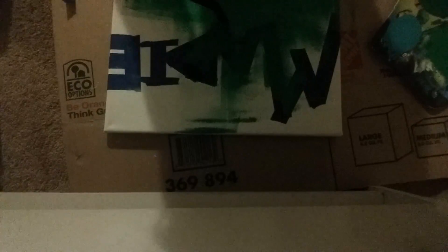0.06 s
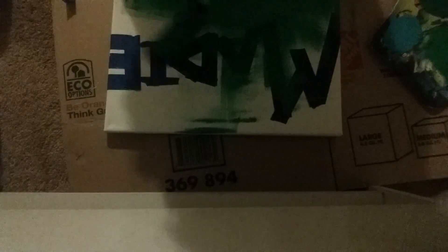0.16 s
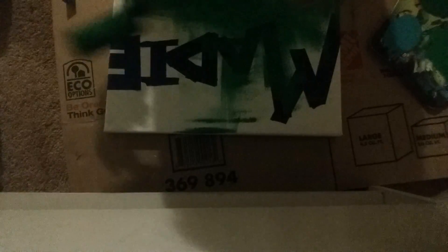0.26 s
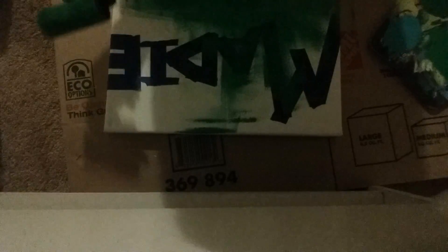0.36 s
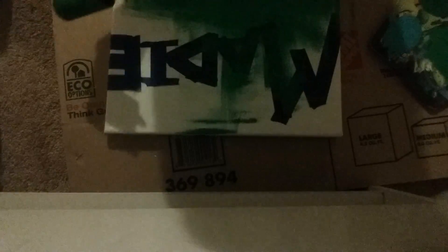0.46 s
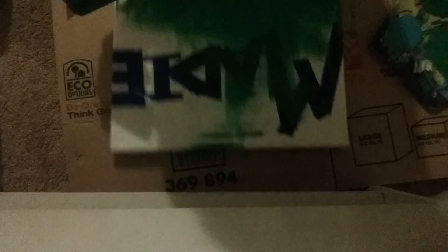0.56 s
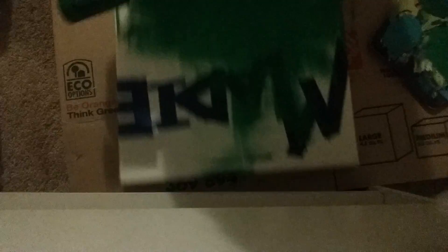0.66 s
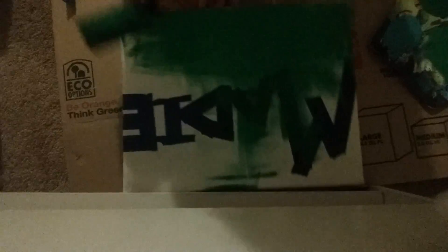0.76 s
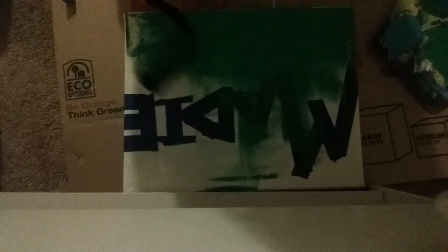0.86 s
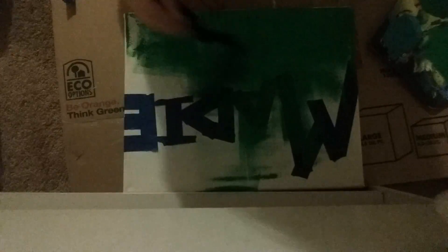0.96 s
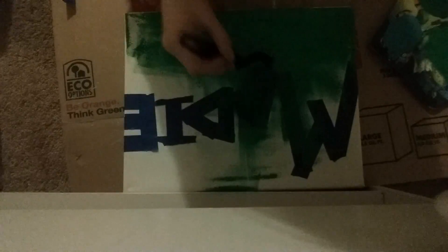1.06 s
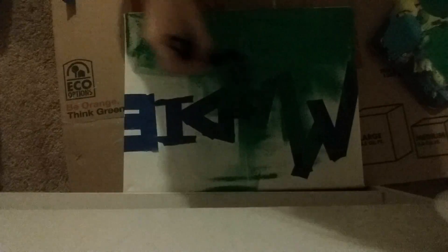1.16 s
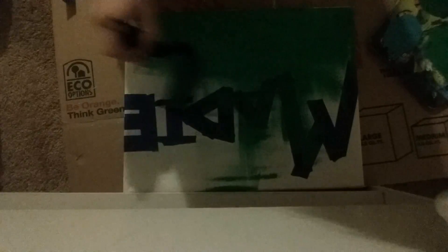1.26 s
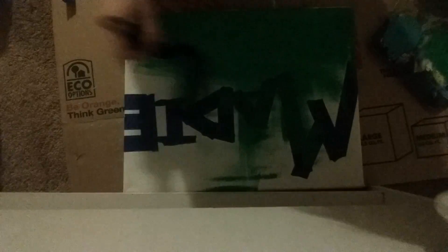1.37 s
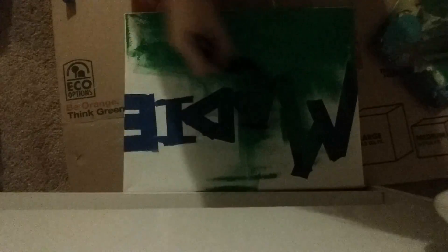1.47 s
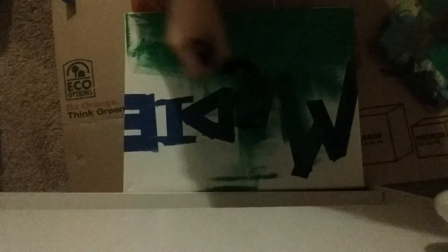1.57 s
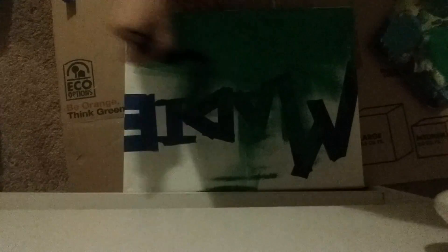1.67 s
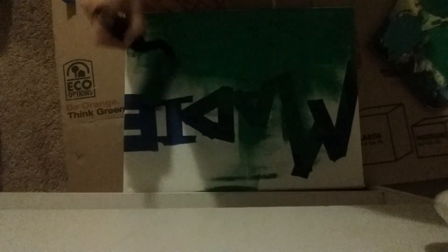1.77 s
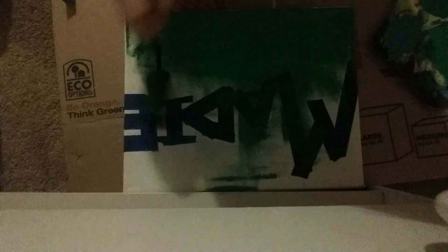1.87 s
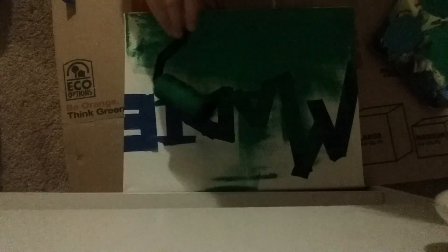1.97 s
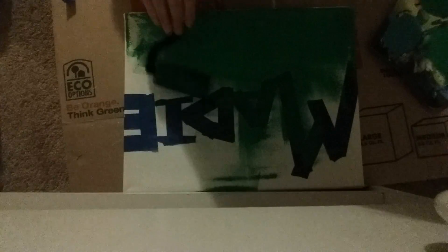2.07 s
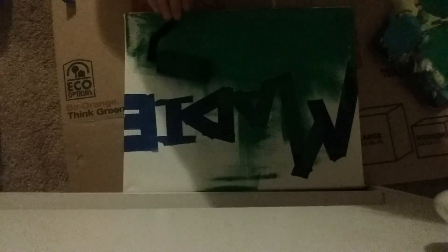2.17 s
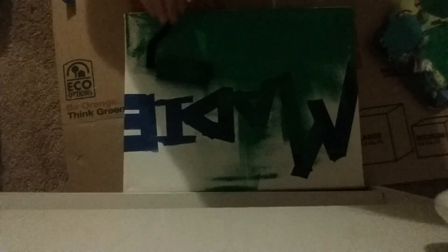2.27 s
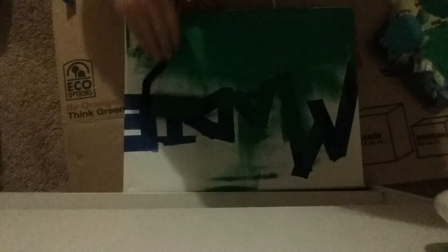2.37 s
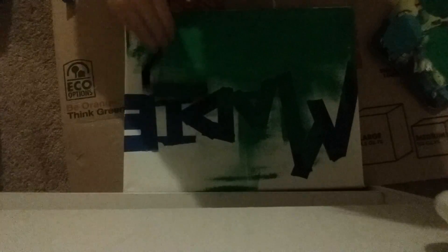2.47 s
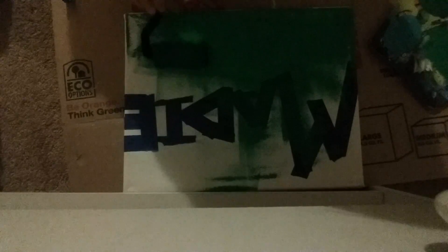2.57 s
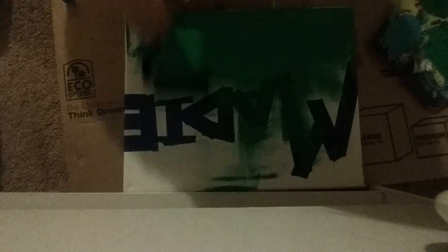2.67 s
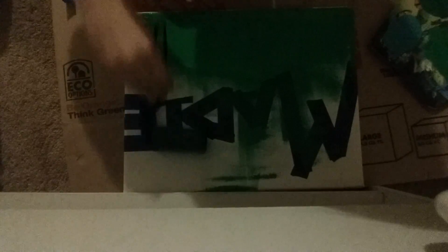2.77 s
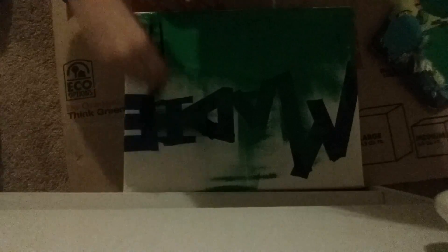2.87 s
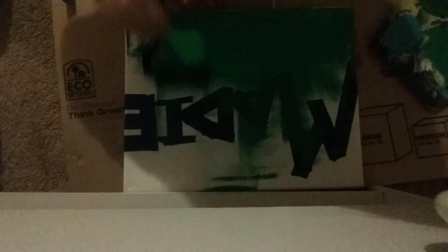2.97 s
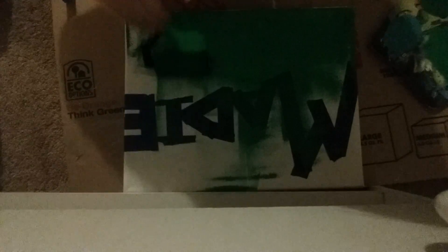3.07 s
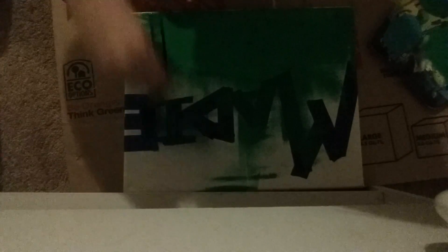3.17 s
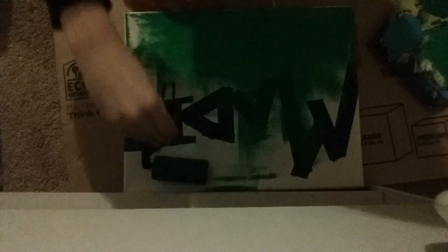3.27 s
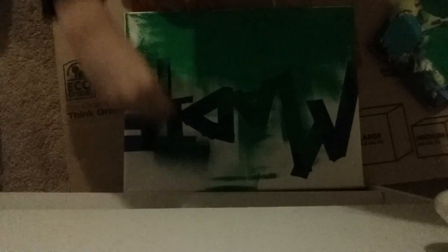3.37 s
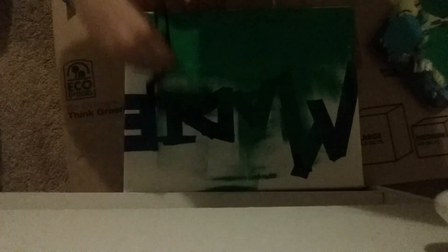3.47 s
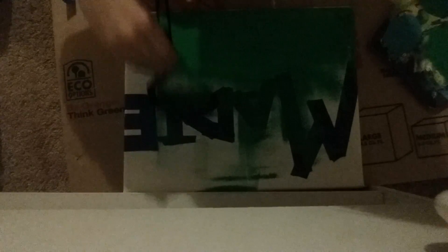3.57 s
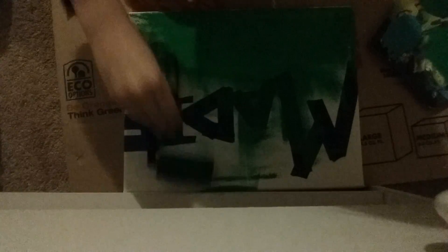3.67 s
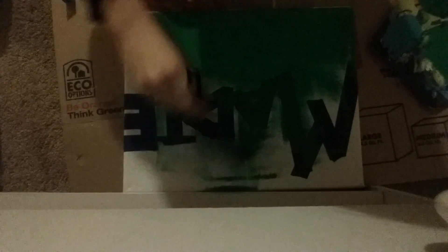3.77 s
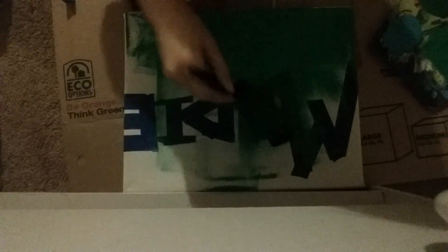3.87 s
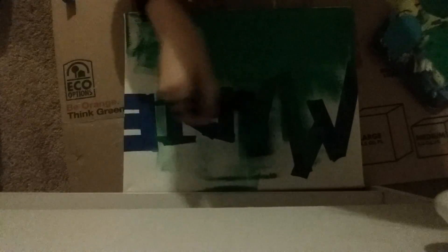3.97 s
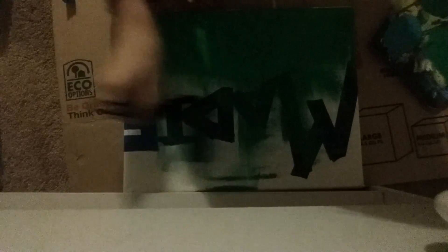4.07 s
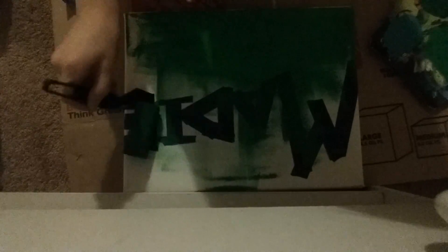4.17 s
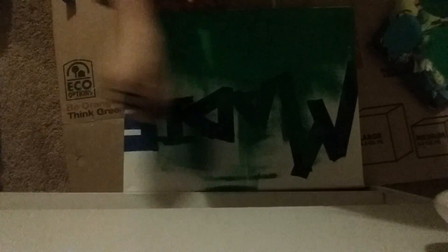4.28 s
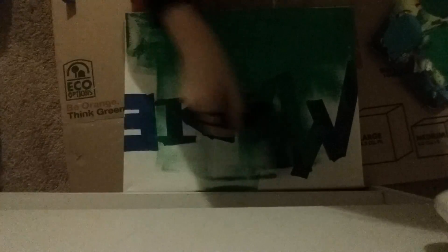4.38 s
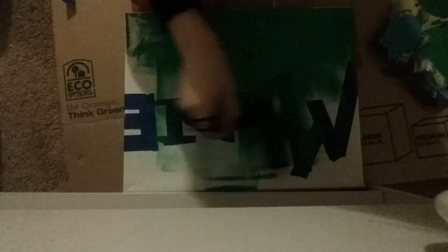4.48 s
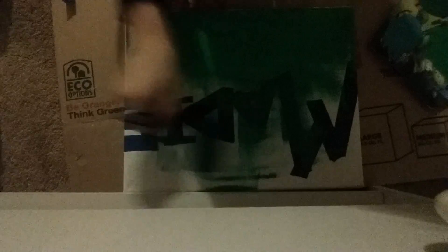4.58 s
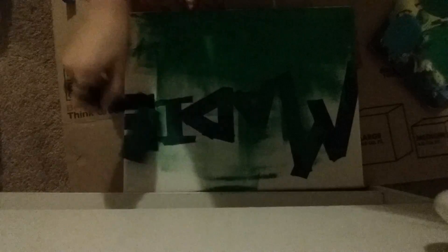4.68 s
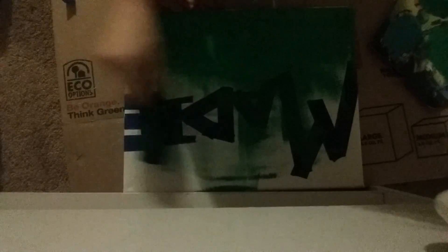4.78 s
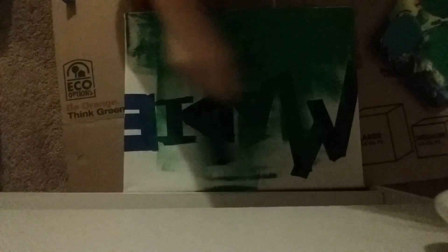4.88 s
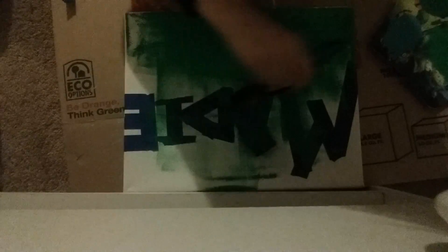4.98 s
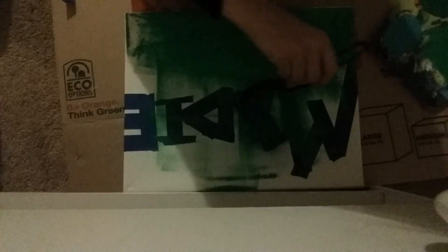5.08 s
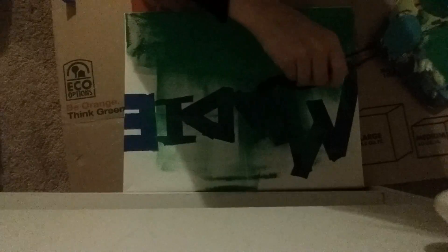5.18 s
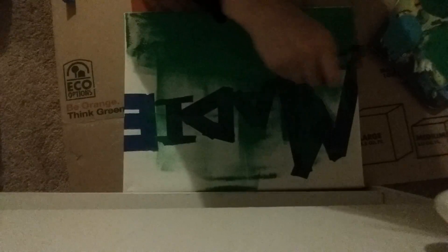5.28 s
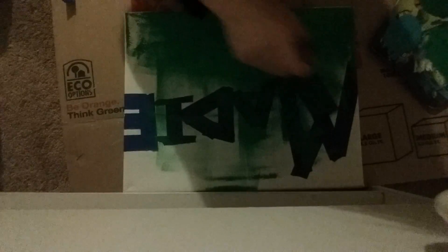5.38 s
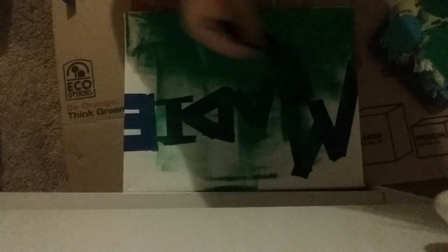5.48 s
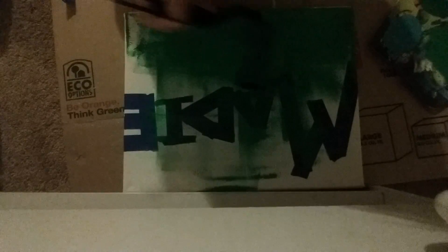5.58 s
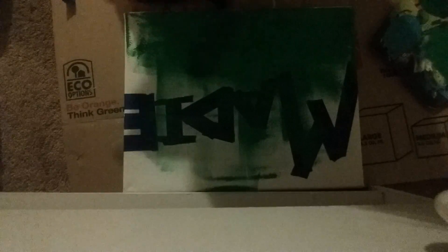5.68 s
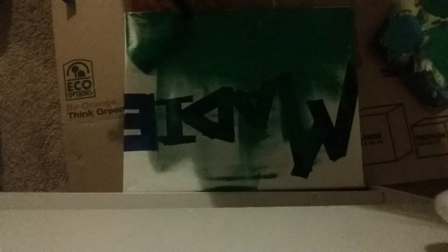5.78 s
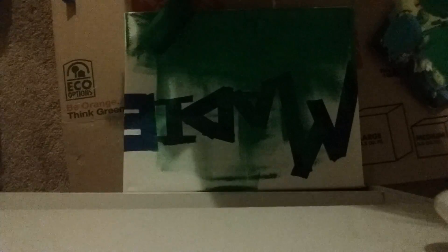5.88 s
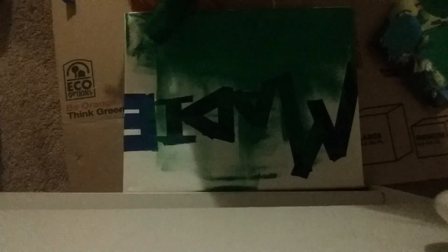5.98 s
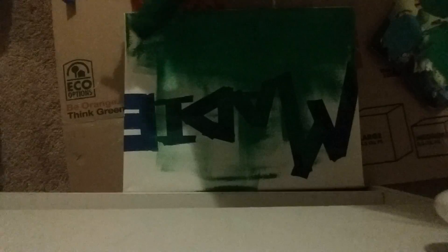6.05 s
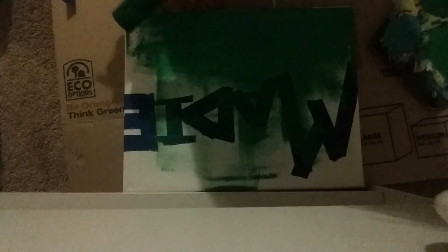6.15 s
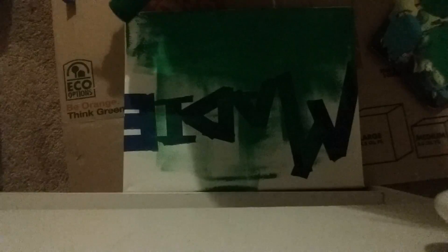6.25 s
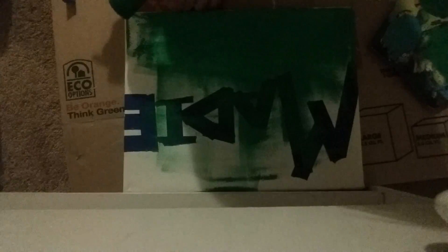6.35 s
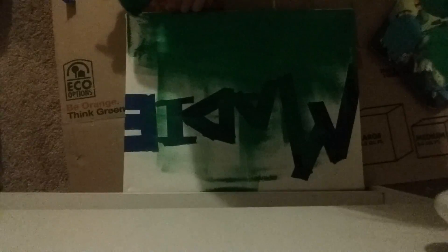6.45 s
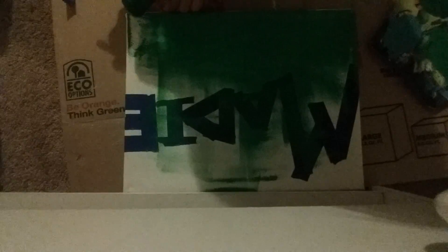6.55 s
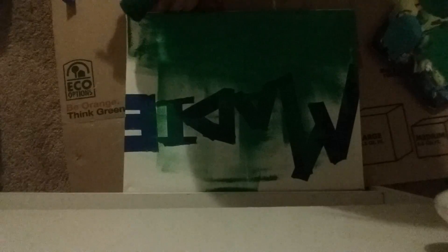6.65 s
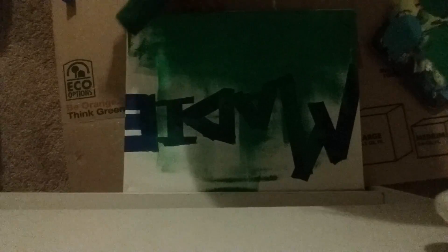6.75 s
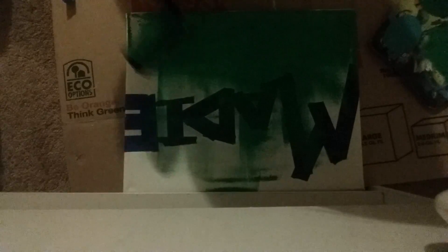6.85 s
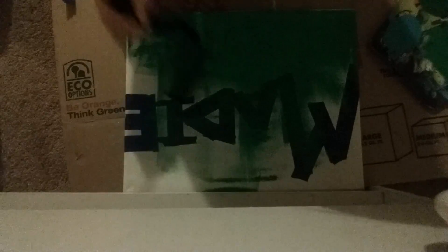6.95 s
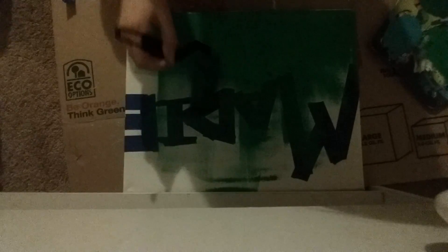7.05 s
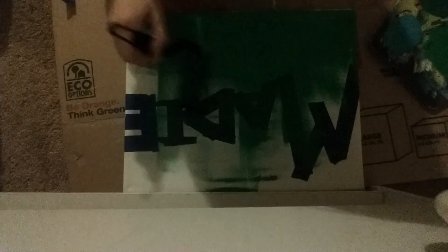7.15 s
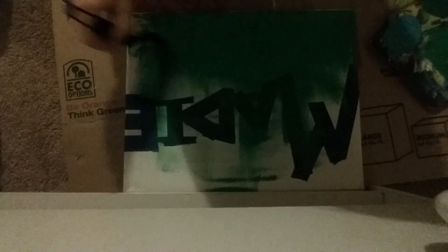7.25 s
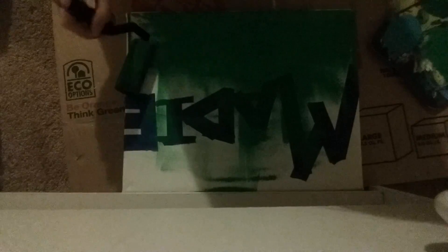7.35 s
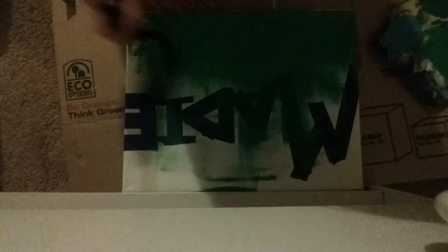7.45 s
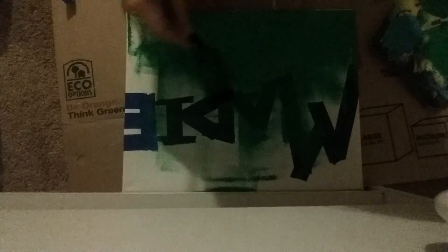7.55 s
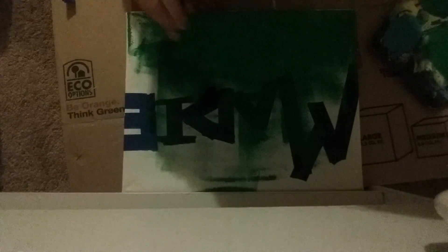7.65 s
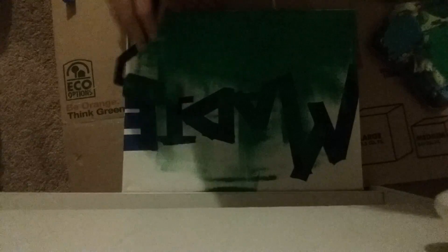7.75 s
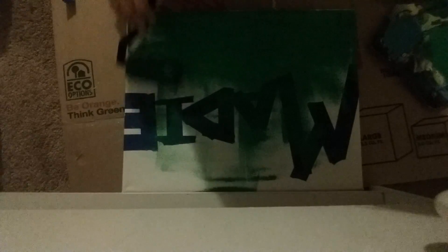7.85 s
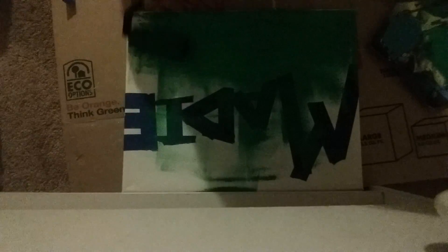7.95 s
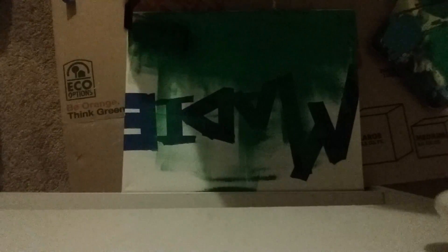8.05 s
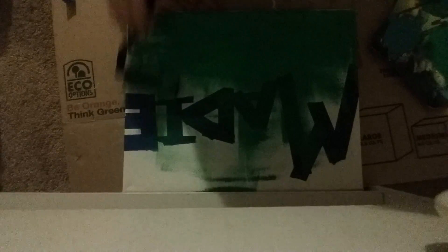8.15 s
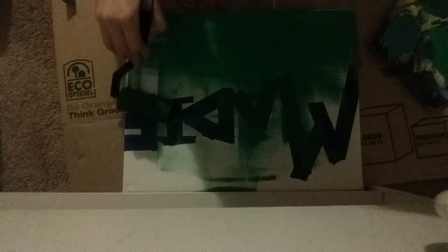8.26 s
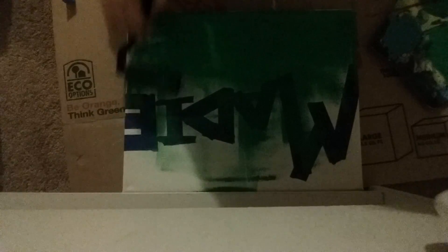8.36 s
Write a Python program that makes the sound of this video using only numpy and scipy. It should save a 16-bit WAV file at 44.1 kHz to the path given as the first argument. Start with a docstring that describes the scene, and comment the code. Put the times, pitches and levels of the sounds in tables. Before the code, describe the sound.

A foam paint roller rubs over a stretched canvas in soft quick strokes, after a loud slide and thump, with scattered knocks in a quiet room.

```python
"""Foam roller on a stretched canvas

Place: a quiet room, a canvas lying on cardboard, a foam paint roller worked to and fro over it.
The canvas is first slid into place: tiny fibre catches make nap hiss, weave scratch and drumming cloth.
Knocks of roller and frame are noise bursts and ringing modes with a room echo; one hard edge drags briefly.
Shaped noise gives the room air and a low rumble that swells around heavy thumps and slides; a sine whines thinly.
The microphone pair faces sideways: the left port is bright, the right one is shaded.
"""
import sys
import numpy as np
from scipy import signal
from scipy.fft import rfft, irfft, next_fast_len
from scipy.io import wavfile

SR = 44100
rng = np.random.default_rng(int(sys.argv[2]) if len(sys.argv) > 2 else 0)


def inscribe(sig):
    """Save sig as 16-bit PCM at rate SR to the path in sys.argv[1].

    A 1-D sig is mono; a 2-D sig holds one channel per row.
    Samples are clipped to [-1, 1] before scaling.
    """
    pcm = np.round(np.clip(np.atleast_2d(sig).T, -1, 1) * 32767)
    wavfile.write(sys.argv[1], SR, pcm.astype(np.int16))


N = 371322   # samples


def amp(db):
    """Turn dB into gain."""
    return 10 ** (np.asarray(db) / 20)


def unit_rms(x):
    """Scale to rms 1."""
    return x / np.sqrt(np.mean(x ** 2) + 1e-20)


def unit_peak(x):
    """Scale to peak 1."""
    return x / np.abs(x).max()


def unit_centre(pair):
    """Scale a pair so that the mean of its channels has rms 1."""
    return pair / np.sqrt(np.mean(pair.mean(axis=0) ** 2))


def level_curve(rows):
    """Join the (time_s, level_db) points of a table by straight lines, one value per sample."""
    time_s, level_db = np.transpose(rows)
    return np.interp(np.arange(N) / SR, time_s, level_db)


def at_hz(points, hz):
    """Read a spectrum table on a log-frequency axis."""
    point_hz, value = np.transpose(points)
    return np.interp(np.log(np.maximum(hz, 1)), np.log(point_hz), value)


def drift(rate_hz):
    """Slow random wander of rms 1: noise through two equal low-pass poles, at one point per 40 samples."""
    pole = np.exp(-2 * np.pi * rate_hz * 40 / SR)
    noise = rng.standard_normal(N // 40 + 2002)
    slow = signal.lfilter([1], [1, -2 * pole, pole * pole], noise)[2000:]   # the filter has settled
    return np.interp(np.arange(N) / 40, np.arange(len(slow)), unit_rms(slow))


def ring(drive, hz, t60_s):
    """Two-pole resonator: a unit click sets a decaying sine of starting height 1 ringing."""
    radius, angle = amp(-60 / (t60_s * SR)), 2 * np.pi * hz / SR
    return signal.lfilter([0, np.sin(angle)], [1, -2 * radius * np.cos(angle), radius * radius],
                          drive + 1e-18)


# How the near sounds differ between the ports: pitch_hz, left_minus_right_db
NEAR_SHADE = [(60, -5), (110, -6), (200, -0.5), (380, -1), (700, -0.5), (1290, 2.5), (2380, 5), (4400, 13),
              (8120, 24), (15000, 4.5)]
# How alike the two ports hear a sound: pitch_hz, likeness (values below 0 count as 0)
PORT_LIKENESS = [(60, 1), (180, 0.91), (550, 0.71), (1650, -0.26), (4970, 0.59), (15000, -0.54)]
# Spectrum without colour: pitch_hz, level_db
NO_COLOUR = [(20, 0), (20000, 0)]
LEFT_LAG_S = -0.000061   # negative: sound reaches the left port first


def ports(near, apart, spectrum, shade):
    """Colour a sound and share it between the ports: likeness, shading and delay act per frequency."""
    size = next_fast_len(N)
    hz = np.arange(size // 2 + 1) * SR / size
    alike = np.clip(at_hz(PORT_LIKENESS, hz), 0, 1)
    common = np.sqrt(1 + alike) * rfft(near, size)
    opposed = np.sqrt(1 - alike) * rfft(apart, size)
    tilt = amp(at_hz(shade, hz) / 2)   # half the difference goes to each port
    lag = np.exp(-2j * np.pi * hz * LEFT_LAG_S)
    left, right = (common + opposed) * tilt * lag, (common - opposed) / tilt
    pair = np.array([left, right]) / np.hypot(tilt, 1 / tilt)
    return irfft(pair * amp(at_hz(spectrum, hz)), size)[:, :N]


def grit(per_s, spread_db, clump_db):
    """Two draws of tiny catches: random clicks of uneven size and either sign, swelling in clumps."""
    sizes = amp(spread_db * np.minimum(rng.exponential(1, (2, N)), 4))
    signs = rng.choice([-1, 1], (2, N))
    caught = rng.random((2, N)) < per_s / SR
    return sizes * signs * caught * amp(clump_db * drift(28.6))


def with_notes(pair, notes, flicker_db, rate_hz):
    """Add narrow resonances that flare up and fade, each in its own time."""
    flares = 0
    for pitch_hz, level_db, t60_s in notes:
        note = unit_centre(ring(pair, pitch_hz, t60_s))
        flares = flares + amp(level_db + flicker_db * np.tanh(drift(rate_hz))) * note
    return unit_centre(unit_centre(pair) + flares)


# How the diffuse sound differs between the ports: pitch_hz, left_minus_right_db
DIFFUSE_SHADE = [(60, -1), (150, -3.5), (380, -3), (950, -22), (2380, -62), (5980, 9), (15000, -6.5)]
# Middle level of the low rumble, swelling around the heavy thumps and slides: time_s, level_db
RUMBLE_LEVEL = [(0.0, -60), (0.82, -50), (2.16, -58.5), (4.92, -54.5), (5.27, -60.5), (5.93, -58.5),
                (6.56, -50), (7.48, -57.5), (7.95, -50.5), (8.42, -54.5)]
# Colour of the low rumble: pitch_hz, level_db (relative, per Hz)
RUMBLE_COLOUR = [(15, -71), (25, -60), (43, -18), (51, -8), (62, -6), (80, 6.5), (103, -4.5), (135, -2),
                 (151, -25), (180, -70), (230, -58), (400, -120)]


def low_rumble():
    """Shaped noise rumbles lumpily: a random drift rides on its level curve."""
    rumble = unit_centre(ports(*rng.standard_normal((2, N)), RUMBLE_COLOUR, DIFFUSE_SHADE))
    return amp(level_curve(RUMBLE_LEVEL) + 1.75 * drift(7.5)) * rumble


# Colour of the room air: pitch_hz, level_db (relative, per Hz)
AIR_COLOUR = [(88, -39), (150, -13), (182, -20), (213, 0), (296, -10.5), (373, 0), (500, -64), (844, -22),
              (1480, -25), (1940, -47), (2500, -24), (2920, -27), (15500, -26)]
AIR_DB = -70.5   # middle level


def room_air():
    """Shaped noise, gently wavering in level."""
    air = unit_centre(ports(*rng.standard_normal((2, N)), AIR_COLOUR, DIFFUSE_SHADE))
    return amp(AIR_DB + 1.9 * drift(4)) * air


WHINE_HZ, WHINE_DB = 1558, -88


def thin_tone():
    """A steady sine, opposite in the two channels."""
    return amp(WHINE_DB) * np.sin(2 * np.pi * WHINE_HZ * np.arange(N) / SR) * [[1], [-1]]


# Strokes of roller or sliding canvas: fastest_s (moment of top speed), speed_up_s, slow_down_s,
# squeak_db (squeaky hiss of the nap), wide_db (hiss above and below the squeak, against its usual share),
# weave_db (scratch on the weave), cloth_db (drumming of the cloth)
STROKES = [(0.2, .4, 0.98, -69, -3, -66.5, -65), (0.52, 0.085, 0.043, -69, 5, -63, -53.5),
           (0.746, .21, 0.16, -49.5, 0, -48, -44), (0.87, 0.066, 0.13, -56.5, -1, -53, -52.5),
           (1.292, 0.33, 0.15, -54.5, -4.5, -58, -55), (1.52, .13, 0.12, -64, -1.5, -61.5, -60.5),
           (1.77, 0.16, .13, -64, -2.5, -62, -60), (1.91, 0.07, 0.027, -63.5, 0, -62.5, -65.5),
           (2.04, 0.3, 0.41, -79.5, -1.5, -79, -69.5), (2.2, 0.074, 0.12, -75, 1, -67.5, -66),
           (2.43, 0.099, 0.08, -70.5, -3.5, -68.5, -65), (2.6, 0.086, .11, -70.5, -2, -65.5, -62.5),
           (2.8, 0.078, .13, -68, -2.5, -62, -58.5), (3.071, 0.14, 0.065, -68, -1, -63.5, -63),
           (3.29, 0.13, 0.13, -67.5, 0.5, -61, -61.5), (3.52, 0.099, 0.11, -70, 1.5, -64, -60),
           (3.81, 0.21, 0.13, -67.5, -0.2, -64, -63), (4.222, 0.18, .09, -68, 2, -61, -59.5),
           (4.41, 0.1, 0.15, -63.5, .4, -59.5, -61.5), (4.712, 0.17, 0.15, -65.5, 0, -61.5, -56),
           (4.98, 0.17, .24, -73.5, 1.2, -69.5, -64.5), (5.341, 0.14, 0.023, -71, -1.5, -75, -86),
           (5.7, 0.38, 0.31, -73.5, -3, -73.5, -73), (6.211, 0.036, .06, -67, -12, -57.5, -59),
           (6.29, 0.12, 0.18, -55, -0.5, -66.5, -60), (6.44, 0.069, 0.051, -58.5, 6.5, -53.5, -47.5),
           (6.53, 0.15, 0.078, -70, 4.5, -61, -52.5), (6.72, 0.15, 0.17, -75, 6, -62, -52.5),
           (6.819, 0.056, 0.086, -52.5, 1, -48, -44.5), (7.0, 0.42, .2, -61.5, -0.5, -65, -62.5),
           (7.35, 0.19, 0.11, -69.5, -2.5, -66, -61.5), (7.55, 0.1, 0.17, -72.5, -1, -65.5, -69),
           (7.86, .11, 0.18, -71, -3, -81, -79), (8.04, 0.17, 0.11, -72, -1, -66.5, -63.5),
           (8.269, 0.14, 0.08, -65.5, -1, -60.5, -60.5), (8.43, 0.069, .1, -73, 2, -73, -74)]
NAP_POWER, WEAVE_POWER, CLOTH_POWER = 1.68, 1.6, 1   # gain grows as speed to this power
NAP_REST_DB, WEAVE_REST_DB, CLOTH_REST_DB = -86, -78, -72.5   # faint contact between strokes


def strokes():
    """Speed swells and sinks as a quarter sine each way; gains of squeak, wide hiss, weave and cloth follow."""
    t = np.arange(N) / SR
    rest_db = [NAP_REST_DB, NAP_REST_DB, WEAVE_REST_DB, CLOTH_REST_DB]
    speed_law = np.array([NAP_POWER, NAP_POWER, WEAVE_POWER, CLOTH_POWER])[:, None]
    power = amp(rest_db)[:, None] ** 2 * np.ones(N)
    for fastest_s, up_s, down_s, squeak_db, wide_db, weave_db, cloth_db in STROKES:
        start_s, end_s = fastest_s - up_s, fastest_s + down_s
        part = slice(max(round(start_s * SR), 0), round(end_s * SR))
        phase = np.interp(t[part], [start_s, fastest_s, end_s], [-1, 0, 1])
        speed = np.cos(np.pi / 2 * phase).clip(0)
        top_gain = amp([squeak_db, squeak_db + wide_db, weave_db, cloth_db])[:, None]
        power[:, part] += (top_gain * speed ** speed_law) ** 2
    return np.sqrt(power)


# Colour of the foam nap's hiss: pitch_hz, level_db (relative, per Hz)
NAP_COLOUR = [(2060, -11.5), (3500, -8.5), (4220, -7.5), (5310, -8), (6690, 1), (9070, -12), (14600, -8.5),
              (15500, 17)]
# Narrow notes inside the squeak: pitch_hz, level_db (before flicker), t60_s
WHISTLES = [(6300, -15, 0.0051), (7020, -19, 0.0078)]
SQUEAK_HZ = [4830, 7270]   # band edges


def nap_hiss(squeak_gain, wide_gain):
    """Dense fibre catches hiss; the squeaky band whistles and has its own gain beside the rest."""
    hiss = ports(*grit(per_s=14000, spread_db=2.0, clump_db=1.5), NAP_COLOUR, NEAR_SHADE)
    squeak, rest = (signal.sosfilt(signal.butter(3, SQUEAK_HZ, kind, fs=SR, output="sos"), hiss)
                    for kind in ("bandpass", "bandstop"))
    whistling = with_notes(squeak, WHISTLES, flicker_db=10.0, rate_hz=3.7)
    return squeak_gain * whistling + wide_gain * rest / np.std(squeak.mean(axis=0))


# Colour of scratch and crackle on the weave: pitch_hz, level_db (relative, per Hz)
WEAVE_COLOUR = [(350, -40), (600, -8), (664, -13.5), (902, -12.5), (1240, -10), (1370, -6.5), (1980, -9.5),
                (2620, -11), (5500, -15), (7150, -32), (12100, -120)]
# Narrow notes inside the scratch: pitch_hz, level_db (before flicker), t60_s
GRAIN_NOTES = [(1200, -12, 0.011), (2104, -20, 0.017)]


def weave_scratch(weave_gain):
    """Sparser catches on the weave scratch and excite flaring notes."""
    weave = ports(*grit(per_s=4000, spread_db=-1.0, clump_db=2.0), WEAVE_COLOUR, NEAR_SHADE)
    return weave_gain * with_notes(weave, GRAIN_NOTES, flicker_db=9.5, rate_hz=4.45)


CRACKLE_PER_S, CRACKLE_DB = 250, -7.5   # level against the scratch


def paint_crackle(weave_gain):
    """Wet paint snaps in sparse clicks that rise and fall with the scratch."""
    crackle = ports(*grit(CRACKLE_PER_S, spread_db=2.5, clump_db=4.0), WEAVE_COLOUR, NEAR_SHADE)
    return weave_gain * amp(CRACKLE_DB) * unit_centre(crackle)


# Modes of stretched cloth and frame: pitch_hz, level_db (relative), t60_s (each player shortens it)
CANVAS_MODES = [(148, -68, 0.12), (171.4, -0.5, 0.35), (209.3, 1.5, 0.13), (260.5, -2.5, 0.18),
                (345.5, 8, 0.046), (420.6, 5, 0.063), (504, -6, 0.11), (649, -12, 0.61), (790, -28, 0.037),
                (1050, -5, 0.25), (1230, -32, 0.046)]


def cloth_drumming(cloth_gain):
    """Catches shake the stretched cloth and set seven of its modes ringing."""
    shakes = grit(per_s=900, spread_db=3.5, clump_db=-0.44)
    rings = 0
    for pitch_hz, level_db, t60_s in CANVAS_MODES[1:8]:
        mode = np.array([ring(shake, pitch_hz, 0.76 * t60_s) for shake in shakes])
        rings = rings + amp(level_db) * mode / np.sqrt(pitch_hz * t60_s)
    return cloth_gain * unit_centre(ports(*rings, NO_COLOUR, NEAR_SHADE))


def rubbing():
    """The nap hisses, the weave scratches, paint crackles and the cloth drums, all led by the strokes."""
    squeak_gain, wide_gain, weave_gain, cloth_gain = strokes()
    nap = nap_hiss(squeak_gain, wide_gain)
    scratch = weave_scratch(weave_gain)
    return nap + scratch + paint_crackle(weave_gain) + cloth_drumming(cloth_gain)


# Knocks of roller and frame: start_s, tick_db (bright tick), crack_db, crack_hz (crack pitch),
# thud_db, thud_hz (pitch the thud favours), boom_db (boom of the board); levels before the low cut
KNOCKS = [(0.105, -54, -33, 5000, -49, 433, -39), (0.478, -36, -29, 1160, -31.5, 330, -37.5),
          (0.511, -36, -22.5, 627, -28, 403, -54), (0.549, -59, -38, 1030, -42, 294, -60),
          (0.835, -59, -38, 800, -17, 326, -13.5), (0.849, -60, -45, 700, -15.5, 184, -15.5),
          (2.175, -48, -36.5, 1830, -54, 153, -40), (2.845, -64, -60, 900, -37, 193, -65),
          (3.316, -63, -48, 880, -39, 156, -37), (3.848, -44.5, -48, 700, -33.5, 258, -39),
          (4.073, -52, -38, 1340, -40.5, 205, -74), (5.151, -58, -47, 1060, -53, 132, -64),
          (6.195, -66, -45, 1020, -46, 374, -61), (6.303, -48, -35, 1050, -31.5, 427, -66),
          (6.435, -48, -31.5, 940, -25.5, 268, -28), (6.465, -57, -38, 800, -48, 180, -44),
          (6.717, -62, -50, 670, -40, 303, -41), (6.807, -35, -31, 3050, -40, 370, -62),
          (6.855, -38, -51, 2600, -39.5, 427, -69), (7.122, -52, -37, 1050, -39, 158, -44),
          (7.498, -41.5, -39, 1660, -64, 300, -51), (7.592, -52, -36, 2980, -60, 175, -64),
          (7.882, -43, -36, 1260, -29.5, 163, -47), (7.892, -47, -31, 1200, -51, 168, -51),
          (8.213, -56, -41, 554, -43.5, 136, -36.5)]
BOOM_HZ, BOOM_T60_S = 98.8, 0.39   # the cardboard under the canvas
THUD_LENGTH = 0.38   # share of the modes' ring time
CRUMBLE_CYCLES, CONTACT_CYCLES = 1.49, 0.055   # trailing pushes; softness, so low blows are softer
TICK_HZ, TICK_T60_S, CRACK_T60_S = [2000, 7900], 0.035, 0.029


def knocks():
    """Each blow ticks and cracks, then crumbles into the modes near its pitch and shakes the cardboard."""
    out, t = np.zeros(N + SR), np.arange(SR // 2) / SR
    click = t == 0
    mode_hz, mode_db, mode_t60 = np.transpose(CANVAS_MODES)[:, :, None]
    luck_db = rng.normal(0, 0.4, (len(KNOCKS), len(CANVAS_MODES), 1))
    noise = rng.standard_normal((len(KNOCKS), 3, len(t)))
    boom = amp(-60 * t / BOOM_T60_S) * np.sin(2 * np.pi * BOOM_HZ * t) * (1 - np.exp(-t / 0.033))
    tick_band = signal.butter(2, TICK_HZ, "band", fs=SR, output="sos")
    for k, (start_s, tick_db, crack_db, crack_hz, thud_db, thud_hz, boom_db) in enumerate(KNOCKS):
        away_db = -13.0 * np.abs(np.log2(mode_hz / thud_hz))   # modes far from the thud's pitch stay weak
        decay_db = -60 * t / (mode_t60 * THUD_LENGTH)
        modes = amp(mode_db + away_db + luck_db[k] + decay_db) * np.sin(2 * np.pi * mode_hz * t)
        pushes = noise[k, 0] * t * np.exp(-t * thud_hz / CRUMBLE_CYCLES)   # small pushes trail the blow
        blow = 2.17 * pushes / np.linalg.norm(pushes) + click
        softness = np.exp(-thud_hz / (CONTACT_CYCLES * SR))
        soft_blow = signal.lfilter([1], [1, -softness], blow)
        thud = signal.fftconvolve(modes.sum(axis=0), soft_blow)[:len(t)]
        crack_drive = noise[k, 1] * amp(-60 * t / CRACK_T60_S) + 16.0 * click
        crack = ring(crack_drive, crack_hz, 4.8 / crack_hz)
        tick = signal.sosfilt(tick_band, noise[k, 2] * amp(-60 * t / TICK_T60_S))
        i = round(start_s * SR)
        out[i:i + len(t)] += (amp(tick_db) * unit_peak(tick) + amp(crack_db) * unit_peak(crack)
                              + amp(thud_db) * unit_peak(thud) + amp(boom_db) * boom)
    low_cut = signal.butter(2, 70, "high", fs=SR, output="sos")   # keeps the knocks free of deep bass
    return signal.sosfilt(low_cut, out[:N])


ROOM_T60_S, ROOM_DB = 0.39, -11.5   # level is applied in scene(), against the direct knocks


def room(x):
    """Walls answer after 4 ms with decaying noise, in two independent echoes."""
    t = np.arange(round(.4 * SR)) / SR
    tail = rng.standard_normal((2, len(t))) * amp(-60 * t / ROOM_T60_S) * (t > .004)
    unit_tail = tail / np.sqrt((tail ** 2).sum(axis=1, keepdims=True))
    return signal.fftconvolve(x[None], unit_tail, axes=1)[:, :N]


# A hard edge drags briefly: time_s, level_db
SCRAPE_LEVEL = [(6.77, -83), (6.8, -44), (6.812, -40.5), (6.858, -52), (6.88, -72), (6.92, -75)]
# Colour of the scrape: pitch_hz, level_db (relative, per Hz)
SCRAPE_COLOUR = [(1200, -34), (2000, -2), (2550, 6), (3200, 5), (4400, -3), (5400, -26)]


def scrape():
    """Coarse slips of an edge, heard only while it drags."""
    t = np.arange(N) / SR
    slips = ports(*grit(per_s=1400, spread_db=-3.5, clump_db=-4.0), SCRAPE_COLOUR, NEAR_SHADE)
    dragging = (t > SCRAPE_LEVEL[0][0]) * (t < SCRAPE_LEVEL[-1][0])
    return amp(level_curve(SCRAPE_LEVEL)) * dragging * unit_centre(slips)


def scene():
    """Sum rumble, air and tone, the rubbing, the knocks with their echo, and the scrape."""
    blows = knocks()
    echo = amp(ROOM_DB) * room(blows)
    # the echo differs most between the ports
    heard = ports(blows + echo[0], 1.8 * echo[1] + 0.24 * blows, NO_COLOUR, NEAR_SHADE)
    return rubbing() + scrape() + heard + low_rumble() + room_air() + thin_tone()


HISS_DB = -80.5   # each microphone's own hiss, before the cuts
BASS_CUT_HZ, TOP_CUT_HZ = 52, 15800


def record(dry):
    """The microphones add hiss and lose the deep bass; the top is cut steeply."""
    hissing = dry + amp(HISS_DB) * rng.standard_normal(dry.shape)
    thin = signal.sosfilt(signal.butter(4, BASS_CUT_HZ, "high", fs=SR, output="sos"), hissing)
    return signal.sosfilt(signal.cheby2(14, 70, TOP_CUT_HZ, fs=SR, output="sos"), thin)


dry = scene()
out = record(dry)
inscribe(out)
```